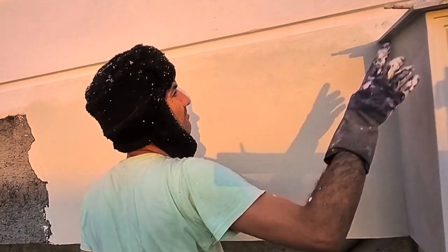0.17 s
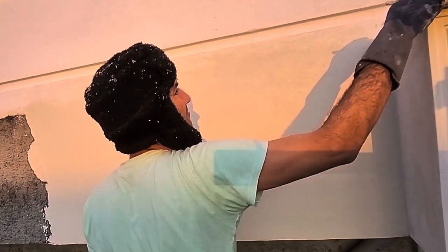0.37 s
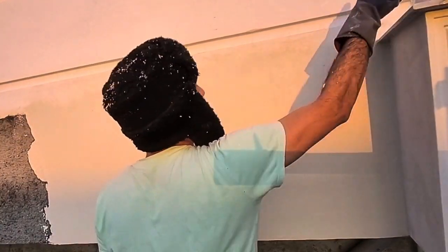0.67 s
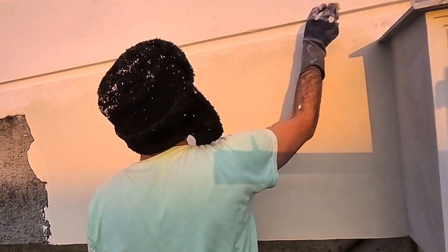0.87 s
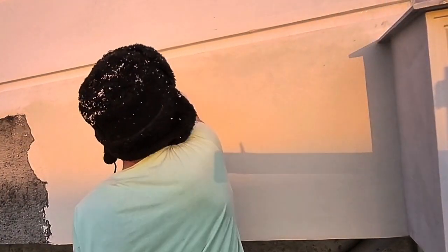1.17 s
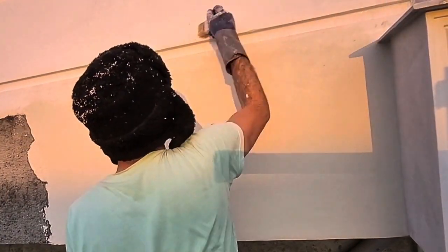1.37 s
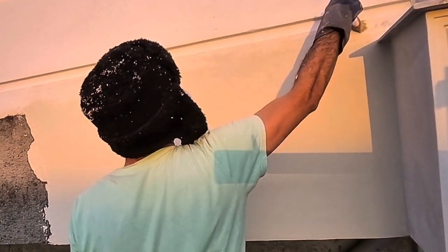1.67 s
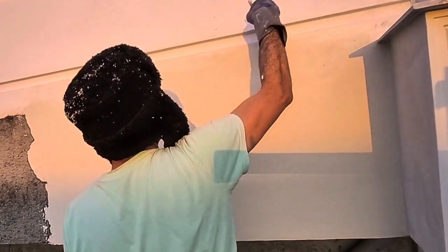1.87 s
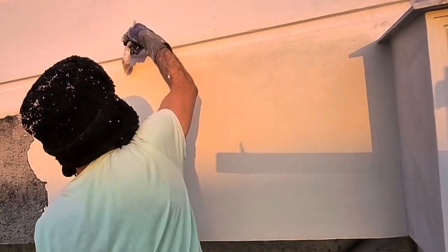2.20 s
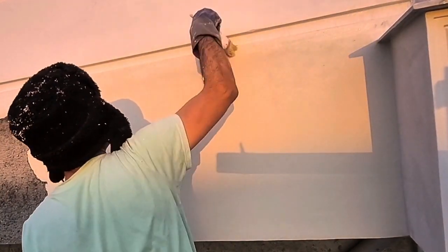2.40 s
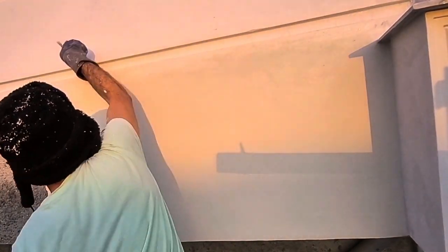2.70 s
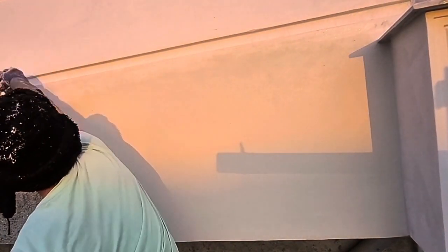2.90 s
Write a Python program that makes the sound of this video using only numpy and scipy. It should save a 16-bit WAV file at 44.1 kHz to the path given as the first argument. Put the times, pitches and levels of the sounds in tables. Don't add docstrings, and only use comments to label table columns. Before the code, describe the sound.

A stiff brush works an outdoor wall: very faint swishes at first, then clearer short hissing, gritty strokes from about 0.9 s, quicker between 2 and 2.7 s. A hard knock with a dull board thump lands at 0.93 s, lighter knocks around 2.0-2.3 s, and the loudest metallic clatter at 2.47 s, rattling until 2.65 s. Low wind buffets the microphone, strongest from 1.1 to 2.9 s, over faint hum; the end is quiet.

```python
import sys
import numpy as np
from scipy import signal
from scipy.fft import rfft, irfft
from scipy.io import wavfile
from scipy.ndimage import uniform_filter1d

SR = 44100
rng = np.random.default_rng(int(sys.argv[2]) if len(sys.argv) > 2 else 0)


def makeup_ratio(level_db):
    decades = np.asarray(level_db, float) / 20
    return 10 ** decades


def to_wav(sig):
    pcm = np.clip(np.atleast_2d(sig), -1, 1) * 32767
    pcm = np.round(pcm).astype(np.int16)
    wavfile.write(sys.argv[1], SR, pcm.T)


N = 134505

# start in seconds, length in seconds, bristle hiss in dB, drag on grit in dB, # place
STROKES = [(-.05, .1, -67.5, -59.5, 0.47), (0.31, 0.29, -65, -60.5, 0.33), (0.753, 0.26, -56, -55, 0.77),
           (0.942, 0.19, -48, -55, 0.3), (1.139, 0.14, -67.5, -58.5, 0.55), (1.271, 0.079, -55, -63, 1),
           (1.314, .17, -46, -54, 0.61), (1.514, 0.15, -48, -47.5, 0.39), (1.648, 0.14, -57.5, -56.5, 0.17),
           (1.712, 0.44, -54.5, -58.5, 0.16), (1.91, 0.11, -52.5, -49, 0.3),
           (2.003, 0.073, -49, -41.5, 0.36), (2.045, 0.076, -48, -49.5, 0.55),
           (2.109, 0.14, -55.5, -51, 0.43), (2.242, 0.09, -46.5, -56, 0.47),
           (2.301, 0.084, -46.5, -55, 0.54), (2.37, 0.12, -62.5, -61, .6), (2.459, 0.082, -45, -29, 0.16),
           (2.545, 0.14, -44, -37.5, 0.42), (2.645, 0.23, -48.5, -45.5, 0.54),
           (2.843, 0.82, -68.5, -61, 0.19)]
# frequency in Hz, level in dB per Hz.
BRISTLE_TONE = [(1000, -44), (3400, -8.5), (5200, -6), (8000, -3), (9000, -15.5), (10500, -14.5),
                (12500, -10.5), (15800, -14)]
# frequency in Hz, level in dB per Hz.
GRIT_TONE = [(300, -6.5), (1500, -7), (2500, -5.5), (4200, -10.5), (6000, -21.5), (9000, -45), (16000, -47)]
# time in seconds, left port level in dB, right port level in dB.
GUSTS = [(0, -66, -62), (.08, -75, -58), (.2, -60, -44), (.32, -63, -54.5), (.5, -58, -49.5),
         (.62, -68, -49), (.85, -57, -49), (1.1, -63, -44), (1.15, -36.5, -69), (1.5, -37.5, -46.5),
         (1.801, -33, -38.5), (1.86, -50, -56), (2.0, -47, -52), (2.13, -42.5, -36), (2.4, -41.5, -57),
         (2.6, -35.5, -48), (2.9, -42.5, -46.5), (3.05, -61, -73)]
# time in seconds, level in dB, frequency in Hz, length in cycles, left over right in dB.
PUFFS_AND_THUDS = [(0.262, -35.5, 64, 1.9, -2), (1.158, -35, 59, 1.4, 15), (1.342, -34.5, 63, 2.2, 26),
                   (1.472, -33.5, 78, 4, 28), (1.51, -33, 75, 1.5, 24), (1.659, -30.5, 63.4, 2.9, 13.5),
                   (1.798, -25, 70, 0.92, 6), (2.331, -42.5, 50, 16, 2), (2.125, -34, 97, 3, 5),
                   (2.553, -29.5, 95, 2.4, 20.5), (2.603, -33, 80, 2.7, 8), (.937, -33, 125, 1.8, 0),
                   (2.47, -35, 121, 1.4, 1)]
# frequency in Hz, level in dB per Hz.
WIND_TONE = [(20, -27), (35, 7), (50, 7.5), (90, 4.5), (150, -8.5), (400, -53)]
# frequency in Hz, level in dB per Hz.
HUM_TONE = [(59, -46), (100, -3.5), (166, -2), (215, -15), (283, -8.5), (752, -26), (1720, -25.5),
            (2860, -34), (16000, -47.5)]
# time in seconds, level in dB, centre of the contact colour in Hz,
# length of the chatter in seconds.
KNOCKS = [(0.35, -63, 2500, .003), (0.374, -61, 4130, .003), (0.382, -54, 4580, 0.0043),
          (0.898, -42, 1940, .004), (1.2, -56, 3000, 0.0052), (1.526, -44, 4160, .006),
          (1.5405, -45, 4500, .004), (1.7438, -46, 2000, 0.0071), (2.932, -56.5, 3000, .003),
          (0.926, -20.5, 1800, 0.0043), (0.928, -20, 593, 0.014), (2.4715, -25.5, 3360, 0.0024),
          (2.508, -30, 600, 0.012), (0.405, -46.5, 4950, 0.0077), (0.563, -51.5, 4500, 0.0016),
          (0.863, -38, 2450, 0.0012), (.9225, -20.5, 1010, 0.0032), (0.924, -28, 4170, 0.0033),
          (0.943, -28.5, 1920, 0.036), (1.913, -43, 2460, 0.0089), (1.937, -34.5, 2670, 0.022),
          (2.016, -26, 900, 0.011), (2.019, -27.5, 1980, 0.037), (2.04, -32, 900, 0.05),
          (2.158, -35.5, 3600, 0.004), (2.255, -34.5, 1000, 0.0011), (2.2615, -26.5, 1360, 0.00044),
          (2.267, -29, 1420, 0.006), (2.4645, -16, 900, 0.0012), (2.4692, -14.5, 3430, 0.0041),
          (2.474, -17, 990, 0.0053), (2.593, -46, 7000, 0.003), (2.5541, -26, 4240, 0.0018),
          (2.56, -23.5, 900, 0.02), (2.593, -35.5, 3880, 0.002), (2.59, -23, 570, 0.048),
          (2.555, -35.5, 9600, 0.0025), (2.628, -34.5, 4500, 0.004), (2.77, -35.5, 1410, 0.015),
          (.925, -35, 8600, 0.0038), (2.469, -33, 12000, .004), (.945, -30, 795, .045),
          (2.029, -27.5, 334, 0.073), (2.51, -26, 1290, 0.039)]
# time in seconds, tray ring in dB, centre of the push in Hz,
# board thump in dB, width of the push in octaves.
JOLTS = [(.495, -50, 1060, -71, 0.091), (.923, -28, 623, -32, 0.2), (.928, -23, 2120, -29, 0.23),
         (.944, -44, 2320, -29.5, .3), (.946, -35, 3750, -60, 0.18), (.99, -44, 2340, -34.5, .15),
         (1.024, -51, 2340, -42, .15), (1.932, -29, 626, -41, .07), (1.935, -37, 1600, -66, .2),
         (2.02, -27.5, 624, -33, 0.12), (2.162, -31.5, 2830, -50.5, 0.27), (2.263, -35.5, 1200, -59, 0.82),
         (2.425, -58, 2640, -70, .1), (2.465, -20, 696, -24.5, 0.93), (2.471, -9.5, 2610, -30.5, 0.33),
         (2.477, -14.5, 1530, -36, 0.15), (2.505, -28, 510, -35.5, 0.16), (2.556, -22.5, 2160, -37, 0.46),
         (2.58, -41, 1550, -34, 0.35), (2.612, -24, 1640, -38, 0.19), (2.635, -29.5, 1920, -39, 0.44),
         (2.594, -27, 4200, -62, 0.18), (2.639, -29.5, 4160, -60, 0.21)]
# frequency in Hz, level in dB, time to fall 60 dB in seconds.
TRAY = [(510, 13, .09), (625, 11, .07), (765, 8, .1), (920, 8, .09), (1045, 8, .1), (1150, 4, .09),
        (1518, 8, .06), (1617, 5, .13), (1915, 5, .1), (2337, 1, .08), (2605, 8, .045), (3292, 6, .06),
        (3700, 4, .05), (4200, 6, .04)]
# frequency in Hz, level in dB, time to fall 60 dB in seconds.
BOARD = [(135, 8, .08), (205, 4, .1), (240, 2, .12), (275, 9, .16), (322, 5, .13)]

EAR_LAG = 10
EDGE_SHARE, RELEASE_S, HUMP_DB = 0.19, 0.034, 8
BRISTLE_PAN_DB, GRIT_PAN_DB, KNOCK_PAN_DB = 6, 7, 4.5
STROKE_ALIKE = 0.17
BUFFET_DB, BUFFET_PER_S = -0.5, 15
HUM_DB, HUM_ALIKE_HZ, RUSTLE_SHARE = -55, 495, 0.15
RISE_SHARE, COLOUR_OCTAVES = 0.18, 0.52
TICK_DB, TICK_HZ = -17.5, 3000
BOUNCE_S, MODE_SCATTER_DB = 0.0098, 1.5
SHADE_HZ, SHADE_DB = 3300, 7
ECHO_DB, ECHO_T60_S = -10, 0.3
NEAR_DB, NEAR_T60_S, NEAR_HZ = -7, 0.015, 900
TOP_HZ = 16150


def colour(x, points):
    p = np.array(points, float)
    f = np.fft.rfftfreq(x.shape[-1], 1 / SR)
    db = np.interp(np.log(f + 1), np.log(p[:, 0]), p[:, 1])
    db -= 12 * np.clip(np.log2(p[0, 0] / (f + 1)), 0, None)
    y = irfft(rfft(x) * makeup_ratio(db), x.shape[-1])
    return y / np.sqrt(np.mean(y ** 2))


def walk(rate):
    k = int(SR / rate)
    steps = np.repeat(rng.standard_normal(N // k + 1), k)
    return 1.88 * uniform_filter1d(uniform_filter1d(steps, k), k)[:N]


def spread(x, pan_db):
    return x * makeup_ratio(np.array([pan_db / 2, -pan_db / 2]).reshape(2, -1))


def unit_energy(x):
    return x / np.sqrt(np.sum(x ** 2))


def filtered(x, order, hz, kind):
    return signal.sosfilt(signal.butter(order, hz, kind, fs=SR, output="sos"), x)


def brush_noise():
    shared = np.sqrt(STROKE_ALIKE) * rng.standard_normal(N)
    return shared + np.sqrt(1 - STROKE_ALIKE) * rng.standard_normal((2, N))


def brush():
    t = np.arange(N) / SR
    hiss, drag = 0, 0
    for start, length, hiss_db, drag_db, peak in STROKES:
        end = start + length
        attack = (t - start) / min(EDGE_SHARE * length, 0.05)
        release = (end - t) / RELEASE_S + 0.25
        edge = np.clip(np.minimum(attack, release), 0, 1)
        peak_s = start + np.clip(peak, 0.05, 0.95) * length
        off_peak = np.interp(t, [start, peak_s, end], [1, 0, 1])
        press = edge * makeup_ratio(-HUMP_DB * off_peak ** 1.09)
        hiss = hiss + makeup_ratio(hiss_db) * press
        drag = drag + makeup_ratio(drag_db) * press
    flicker_db = 1.44 * walk(60.35) + 0.71 * walk(20) + 1.2 * rng.exponential(size=N)
    fine = colour(brush_noise() * makeup_ratio(flicker_db), BRISTLE_TONE)
    stutter_db = 2.0 * walk(97) + 0.34 * walk(400)
    rough = colour(brush_noise() * makeup_ratio(stutter_db), GRIT_TONE)
    left, right = spread(fine * hiss, BRISTLE_PAN_DB) + spread(rough * drag, GRIT_PAN_DB)
    return np.array([left, np.roll(right, EAR_LAG)])


def wind():
    t = np.arange(N) / SR
    g = np.array(GUSTS)
    gust_db = np.array([np.interp(t, g[:, 0], g[:, k]) for k in (1, 2)])
    buffet = makeup_ratio(BUFFET_DB * np.array([walk(BUFFET_PER_S), walk(BUFFET_PER_S)]))
    out = colour(rng.standard_normal((2, N)) * buffet, WIND_TONE) * makeup_ratio(gust_db)
    for s, puff_db, hz, cycles, pan_db in PUFFS_AND_THUDS:
        swell = np.exp(-(3.43 * hz * (t - s) / cycles) ** 2)
        puff = makeup_ratio(puff_db) * np.cos(2 * np.pi * hz * (t - s)) * swell
        out += spread(puff, pan_db)
    return out


def hum():
    g = np.array(GUSTS)
    gust_db = np.interp(np.arange(N) / SR, g[:, 0], g[:, 1]) + 60
    bass = rng.standard_normal(N) + 0.21 * rng.standard_normal((2, N))
    treble = rng.standard_normal((2, N))
    wash = filtered(bass, 2, HUM_ALIKE_HZ, "low") + filtered(treble, 2, HUM_ALIKE_HZ, "high")
    return colour(wash, HUM_TONE) * makeup_ratio(HUM_DB + RUSTLE_SHARE * gust_db + 0.94 * walk(6.37))


def chatter(length, hz, octaves):
    t = np.arange(4096) / SR
    bounces = rng.standard_normal(4096) * makeup_ratio(2.5 * rng.exponential(size=4096))
    rise = np.clip(t / (0.0004 + RISE_SHARE * length), 0, 1)
    plain = unit_energy(bounces * np.exp(-t / length) * rise)
    return plain, filtered(plain, 2, [hz * 2 ** -octaves, hz * 2 ** octaves], "band")


def ring(modes, scatter_db, phase, t):
    m = np.array(modes, float)
    waves = np.sin(2 * np.pi * (m[:, :1] * t + phase[:, None]))
    decay = makeup_ratio(-60 * t / m[:, 2:])
    return makeup_ratio(m[:, 1] + scatter_db) @ (waves * decay) / np.sqrt(len(m))


def contacts():
    out = np.zeros(N + SR)
    for s, db, hz, length in KNOCKS:
        plain, crack = chatter(length, hz, COLOUR_OCTAVES)
        tick = makeup_ratio(TICK_DB) * min(hz / TICK_HZ, 1) ** 2 * plain
        i = int(s * SR)
        out[i:i + 4096] += makeup_ratio(db) * 10 * (0.64 * unit_energy(crack) + tick)
    return out[:N]


def jolts():
    t = np.arange(SR // 2) / SR
    out = np.zeros(N + SR)
    for s, tray_db, hz, thump_db, width in JOLTS:
        octaves_off = np.log2(np.array(TRAY)[:, 0] / hz)
        reach_db = -np.minimum(6 * (octaves_off / width) ** 2, 24)
        tray_scatter = MODE_SCATTER_DB * rng.standard_normal(len(TRAY))
        tray = ring(TRAY, tray_scatter + reach_db, rng.random(len(TRAY)), t)
        tray *= np.clip(t / 0.001, 0, 1)
        shove = unit_energy(chatter(BOUNCE_S, 156, 1.26)[1]) / 10
        board_scatter = MODE_SCATTER_DB * rng.standard_normal(len(BOARD))
        board = ring(BOARD, board_scatter, rng.random(len(BOARD)) / 4, t)
        thump = signal.fftconvolve(shove, board)[:len(t)]
        i = int(s * SR)
        out[i:i + len(t)] += makeup_ratio(tray_db) * tray + makeup_ratio(thump_db) * thump
    return out[:N]


def reflections(x, t60_s):
    t = np.arange(SR // 2) / SR
    tail = rng.standard_normal((2, len(t))) * makeup_ratio(-60 * t / t60_s) * (t > 0.0005)
    tail = tail / np.sqrt(np.sum(tail ** 2) / 2)
    return signal.fftconvolve(x[None], tail, axes=1)[:, :N]


def knocks():
    direct = contacts() + jolts()
    shade = signal.butter(2, SHADE_HZ, "high", fs=SR, output="sos")
    treble = signal.sosfiltfilt(shade, direct)
    right = np.roll(direct + (makeup_ratio(SHADE_DB) - 1) * treble, EAR_LAG)
    echo = makeup_ratio(ECHO_DB) * reflections(filtered(direct, 1, 400, "high"), ECHO_T60_S)
    near = makeup_ratio(NEAR_DB) * reflections(filtered(direct, 2, NEAR_HZ, "high"), NEAR_T60_S)
    return spread(np.array([direct, right]), KNOCK_PAN_DB) + echo + near


def scene():
    return brush() + wind() + hum() + knocks()


def roll_off(x):
    return signal.sosfilt(signal.butter(12, 16970, fs=SR, output="sos"), x)


def record(dry):
    top_cut = signal.ellip(10, 0.2, 70, TOP_HZ, fs=SR, output="sos")
    return roll_off(signal.sosfilt(top_cut, dry))


dry = scene()
out = record(dry)
to_wav(out)
```